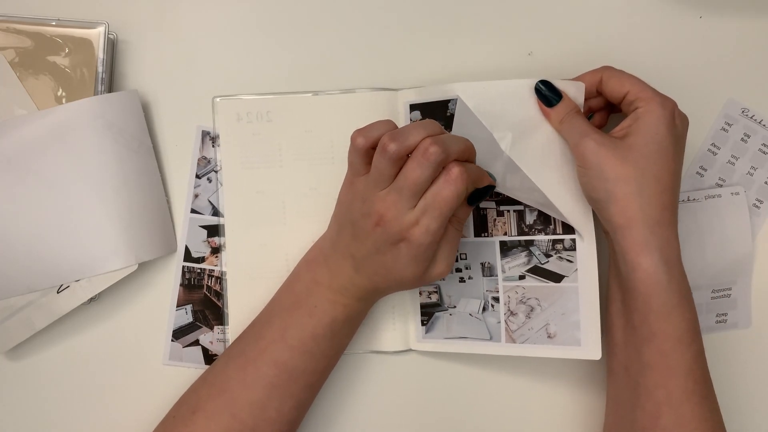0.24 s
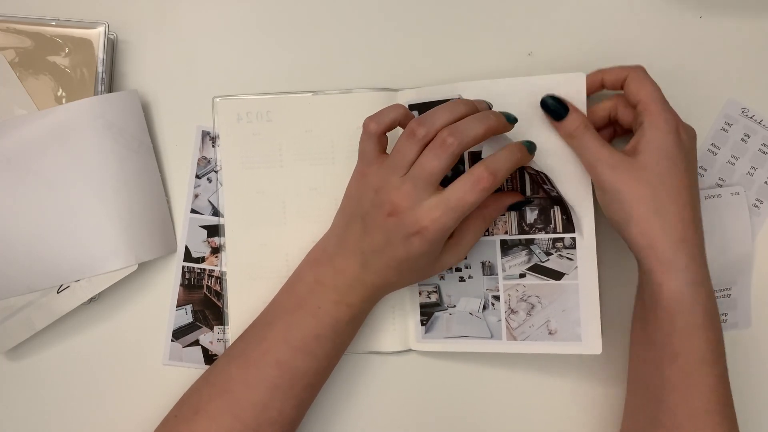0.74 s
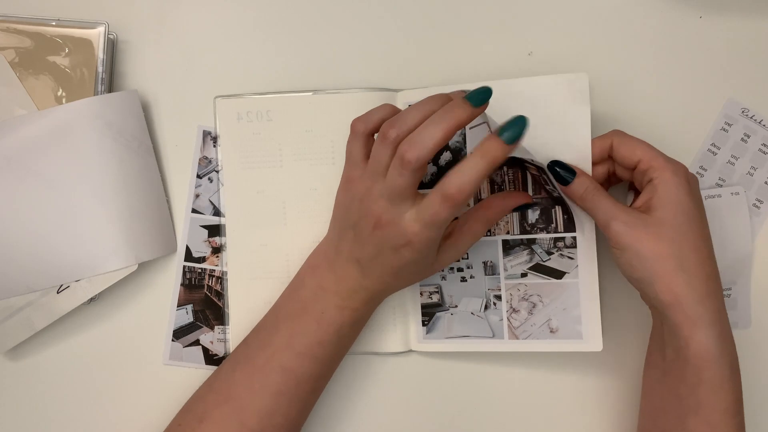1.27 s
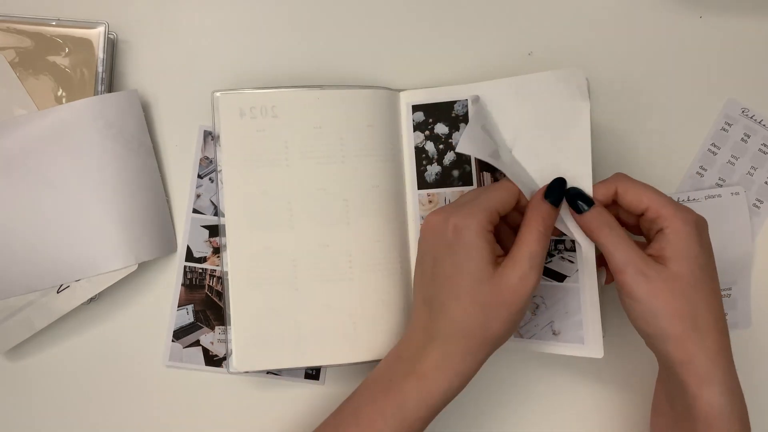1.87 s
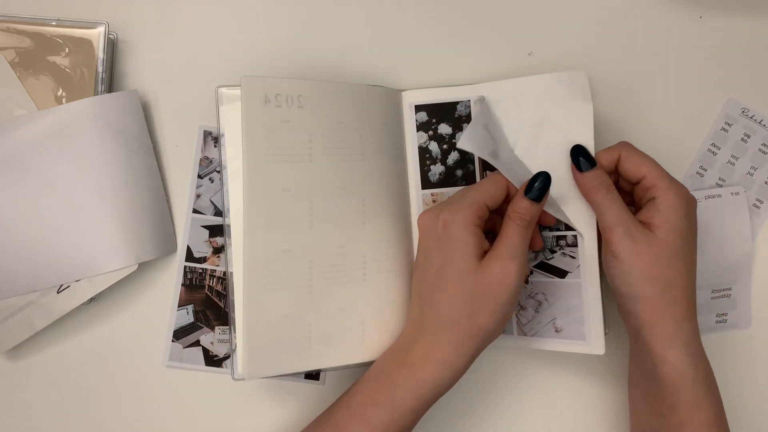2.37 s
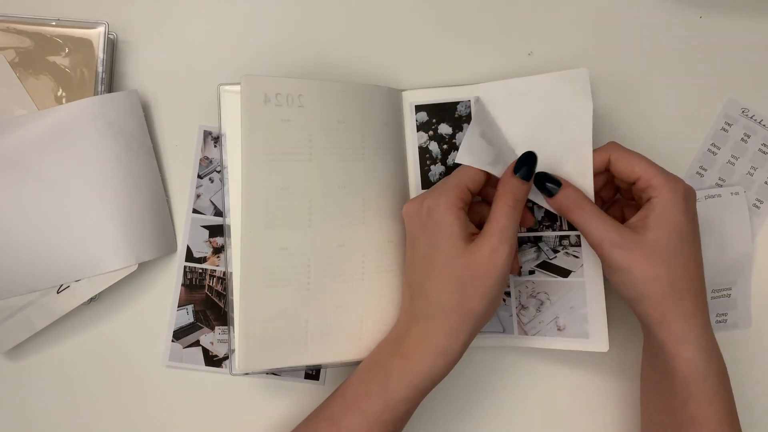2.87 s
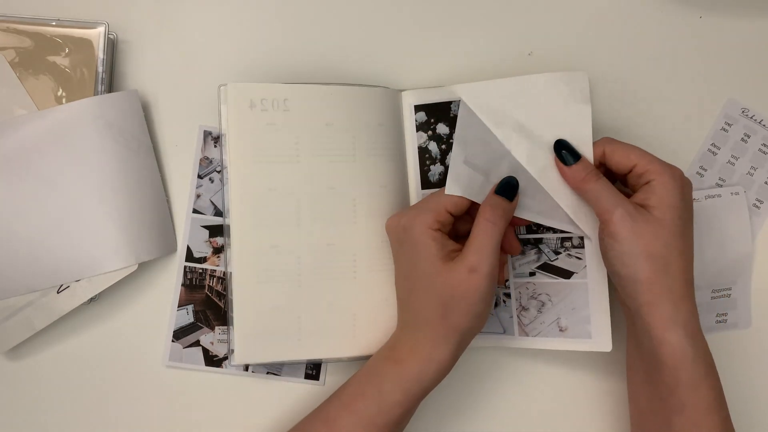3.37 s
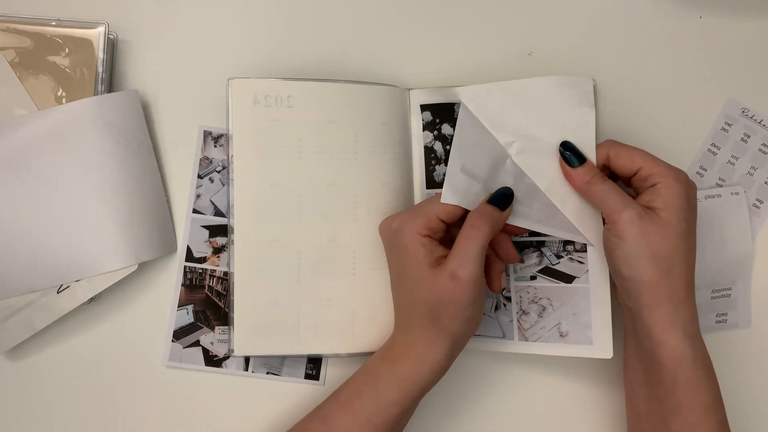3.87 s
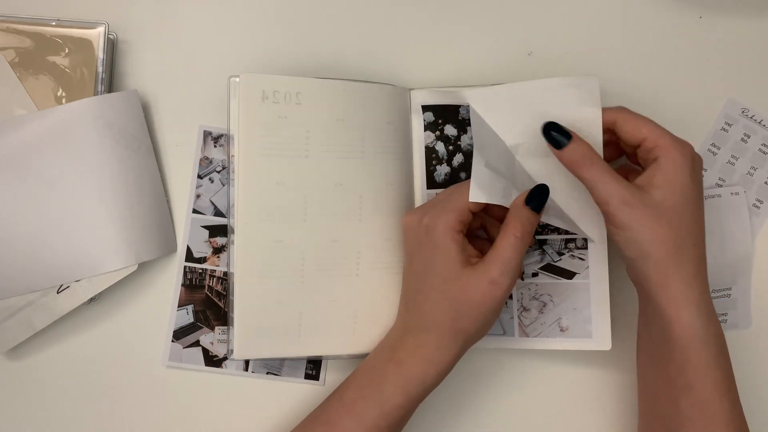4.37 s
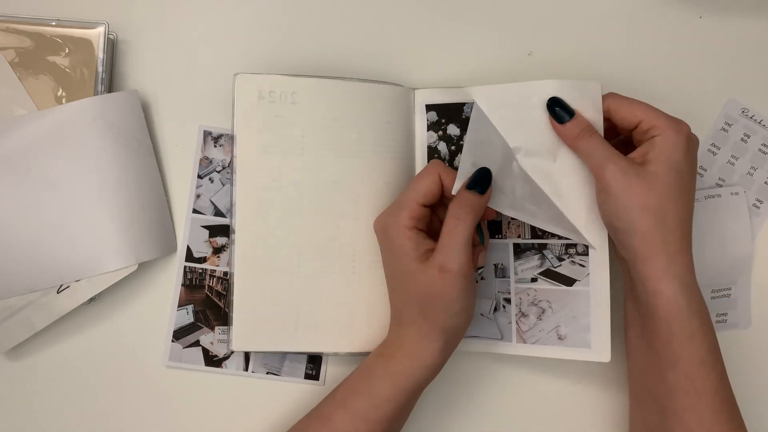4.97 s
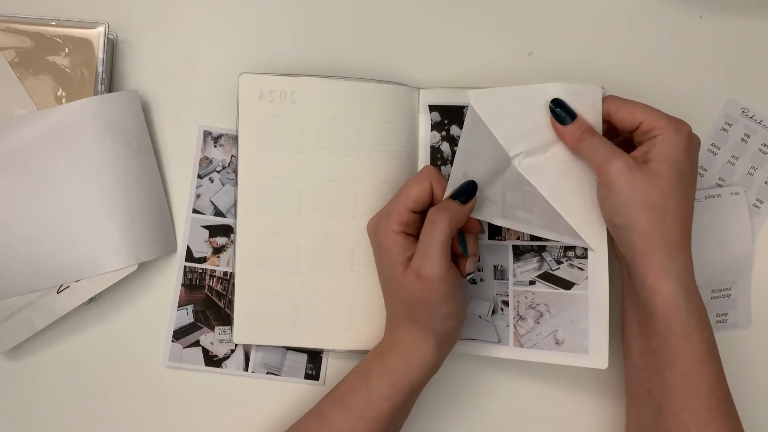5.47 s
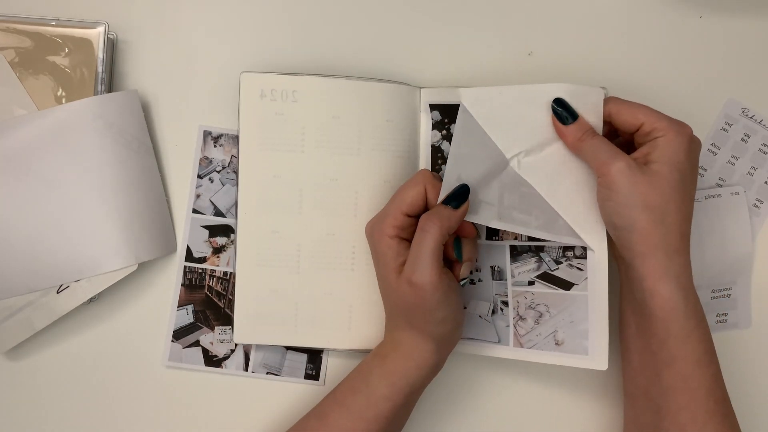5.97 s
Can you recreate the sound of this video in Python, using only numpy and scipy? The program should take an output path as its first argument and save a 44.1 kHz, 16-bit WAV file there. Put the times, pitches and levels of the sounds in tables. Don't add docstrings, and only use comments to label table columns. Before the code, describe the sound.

In a quiet small room, nails pick at the waxed backing of a large sticker in a notebook on a desk, giving crisp clicks and light thumps. A steady bright hiss of parting glue runs for over a second, flecked with snaps. Then the sheet is folded with sharp cracks, and settles in small irregular crinkles. Close stereo microphone above.

```python
import sys
import numpy as np
from scipy import signal
from scipy.fft import rfft, irfft
from scipy.io import wavfile
from scipy.ndimage import uniform_filter1d

SR = 44100
rng = np.random.default_rng(int(sys.argv[2]) if len(sys.argv) > 2 else 0)


def waveform_to_disk(signal):
    frames = np.transpose(np.atleast_2d(signal))
    scaled = np.clip(frames, -1, 1) * 32767
    samples = np.round(scaled).astype(np.int16)
    wavfile.write(sys.argv[1], SR, samples)


def voltage_ratio(level):
    return 10 ** (np.asarray(level, float) / 20)


N = 275184
HZ = np.arange(N // 2 + 1) * SR / N + 1e-3

# middle_s, half_length_s, deep_level_db, hum_over_deep_db
LEANS = [(0.76, 0.04, -85.5, 23), (1.237, 0.077, -66.5, 3.5), (1.42, 0.12, -60, -13),
         (1.752, 0.12, -57.5, -32), (1.984, 0.13, -56.5, -11), (2.28, 0.13, -60.5, -10),
         (2.9, 0.28, -69.5, -4.5), (3.34, 0.14, -87, 22), (4.385, 0.18, -76, 0), (4.556, 0.019, -66, 9),
         (4.608, 0.025, -57, -15), (5.874, 0.19, -75, 3), (6.184, 0.016, -64.5, 14.5)]
# pitch_hz, level_db
DEEP_COLOUR = [(26, -18), (31, -5), (38.5, -1), (46, -2), (60, -2.5), (75, -3.5), (90, -5.5)]
HUM_COLOUR = [(90, 1.5), (105, -7), (114, 9.5), (125, -5), (150, -5.5), (200, -2.5), (300, -17)]
DEEP_DB, HUM_DB, PATCHY_DB = -72, -76.5, 3.0
FAN_HZ, FAN_DB, FAN_OCTAVE_DB, FAN_NOISE_DB, FAN_IDLE_DB = 38, 1, -13, -6.5, -85

# middle_s, half_length_s, level_db, brightness_db
DRAGS = [(0.001, 0.029, -59.5, -15), (0.662, 0.012, -50, -4), (0.744, 0.01, -46, -8.5),
         (0.882, 0.075, -63.5, 1.5), (1.121, 0.016, -49.5, -16.5), (1.17, 0.021, -51.5, -14),
         (1.296, 0.025, -61.5, 0), (1.317, 0.087, -56, -13.5), (1.398, 0.022, -62, 0.5),
         (1.58, 0.027, -61, -4), (1.846, 0.057, -57, -9), (2.312, 0.0061, -51, 6.5),
         (2.474, 0.097, -44, -13), (2.637, 0.06, -48, -17), (2.974, 0.05, -56, -15),
         (3.404, 0.037, -61.5, 2.5), (3.95, 0.055, -92.5, 29), (4.006, 0.023, -54, -2),
         (4.016, 0.0047, -71, 22.5), (4.269, 0.016, -51.5, -15.5), (4.59, 0.016, -44.5, -23),
         (4.935, 0.025, -51, -40), (5.22, 0.077, -80, 12.5), (5.688, 0.22, -73, 6), (5.888, 0.073, -84, 10),
         (6.176, 0.018, -53.5, -11.5)]
# time_s, level_db
GRIP = [(0.0, -79.5), (0.54, -75), (0.69, -113), (0.9, -66.5), (1.27, -62.5), (1.45, -63.5), (2.47, -55.5),
        (3.0, -63.5), (3.45, -69), (3.77, -60.5), (4.05, -77), (4.26, -63.5), (4.45, -63), (4.78, -63),
        (5.51, -73), (5.79, -71), (6.1, -73.5), (6.24, -50)]
# time_s, level_db
PEEL = [
    (1.42, -84),
    (1.61, -54),
    (1.77, -44),
    (2.15, -43.5),
    (2.28, -46.5),
    (2.8, -46.5),
    (2.95, -48),
    (2.99, -63),
    (3.06, -106),
]
PEEL_MIDDLE_DB, PEEL_BODY_DB, RASP_RISE_DB_PER_S = -6.5, -13, 3
RASP_FOLLOWS = 0.59
GRIP_TREBLE_DB, GRIP_MIDDLE_DB = -13, -13
DRAG_MIDDLE_DB, DRAG_MIDDLE_SHARE = -0.5, 0.74
# pitch_hz, level_db
TREBLE_COLOUR = [(8000, 3), (8600, -1), (9600, -1), (11500, -6.5), (13000, -7.5), (15000, -10.5),
                 (15700, -2)]
MIDDLE_COLOUR = [(2000, -57), (2700, -14), (3600, -13), (5200, -6), (6500, 2), (7300, 10), (7750, 2)]
BODY_COLOUR = [(170, 1), (300, -9.5), (500, 0), (750, -10), (1100, -4.5), (1950, -2.5), (2600, 0),
               (5000, -15)]

# start_s, thud_level_db, crack_level_db, panel_pitch_hz
PICKS = [(0.0014, -49.5, -57.5, 580), (0.353, -76, -53, 980), (0.4825, -55.5, -51.5, 1470),
         (0.5903, -62.5, -84.5, 430), (0.648, -44, -27, 1310), (0.6594, -38.5, -32.5, 1190),
         (0.7385, -44.5, -29.5, 1300), (0.8688, -53.5, -47, 1430), (0.9308, -43, -77, 2140),
         (1.0013, -54, -53, 1238), (1.0896, -50, -50, 1260), (1.1137, -43.5, -49, 1880),
         (1.125, -74, -53, 1800), (1.202, -33.5, -26.5, 1270), (1.258, -36, -23, 1880),
         (1.2688, -53, -38, 1950), (1.292, -55, -83, 2020)]
TICKS = [(0.905, -58, -60, 2080), (0.941, -57, -64, 2200), (1.065, -64, -73, 1140), (1.079, -51, -67, 960),
         (1.101, -55, -60, 1100), (1.108, -61, -60, 1000), (1.162, -48, -46, 1970), (1.195, -48, -57, 1200),
         (1.217, -54, -60, 1100), (1.279, -48, -52, 1900), (2.259, -51.5, -50, 590), (2.3, -61, -46, 900),
         (2.439, -46.5, -50, 1630), (2.465, -62, -60, 600), (2.559, -59, -51, 1000),
         (2.584, -54.5, -60, 900), (2.705, -64, -41, 700), (2.774, -66, -38, 1840), (2.901, -57, -45, 2900),
         (2.936, -52, -45, 2700), (3.22, -57, -58, 1800), (3.397, -58, -60, 650), (3.494, -41.5, -53, 920),
         (4.167, -61, -79, 827), (4.231, -58, -68, 1160), (4.285, -44.5, -66, 900), (4.482, -72, -69, 2450),
         (0.638, -66, -51, 1010), (3.725, -50.5, -50, 1100), (3.99, -48, -56, 1100),
         (4.558, -48.5, -59, 1200), (4.592, -40, -57, 1300), (4.749, -65, -47, 2000),
         (4.845, -61.5, -68, 1000), (4.893, -62, -70, 1120), (4.935, -50.5, -65, 686),
         (5.003, -54.5, -58, 1020), (5.121, -62.5, -70, 1880), (5.138, -65, -72, 1000),
         (5.203, -60, -53, 820), (5.231, -52.5, -70, 460), (5.262, -58.5, -70, 520),
         (5.307, -60.5, -70, 1100), (5.427, -68, -56, 940), (5.713, -69, -65, 1010), (5.78, -57, -70, 450),
         (5.875, -70, -51, 1800), (6.02, -59.5, -79, 536), (6.07, -68, -68, 1200)]
TUGS = [(1.578, -55.5, -70, 480), (1.782, -49.5, -49, 1550), (1.908, -53, -60, 560), (2.14, -51, -60, 1000),
        (2.235, -53, -58, 540), (1.8281, -46.5, -39, 1580), (2.006, -47, -59, 1030),
        (2.2754, -43.5, -32, 1320), (2.311, -37.5, -34, 990), (2.366, -55, -52, 1110),
        (2.388, -46.5, -56, 1090), (2.3988, -50.5, -42, 1150), (2.4085, -47.5, -35, 1200),
        (2.444, -48, -35, 583), (2.514, -45, -39, 1220), (2.6189, -48.5, -43, 633), (2.6317, -48, -56, 895),
        (2.6436, -47.5, -57, 1750), (2.9489, -50, -36, 765), (3.0452, -46, -94, 910),
        (3.1805, -51.5, -82, 930), (3.2045, -45, -81, 1600), (3.2414, -52.5, -57, 880)]
CREASES = [(3.343, -30.5, -14, 2340), (3.352, -53.5, -35, 1800), (3.3836, -48, -45, 826),
           (3.4895, -35, -35, 1970), (3.499, -39.5, -51, 1040), (3.516, -42.5, -23.5, 1880),
           (3.7112, -39.5, -32.5, 1220), (4.0031, -37.5, -33, 970), (4.186, -52.5, -93, 1620),
           (4.243, -46.5, -42, 950), (4.258, -43, -45.5, 1880), (4.274, -39.5, -76, 1800),
           (4.5038, -46, -55, 1020), (4.5406, -47, -40.5, 820), (4.5805, -40, -29, 1030),
           (4.6048, -34, -18.5, 1800), (4.6123, -41.5, -29, 1870)]
SETTLES = [(4.7375, -57, -36.5, 2020), (4.7648, -56, -58, 1010), (4.8323, -65, -47.5, 1040),
           (4.8592, -68, -39.5, 910), (4.8706, -57.5, -38, 1830), (4.9127, -41.5, -36, 875),
           (4.9254, -45, -65, 724), (4.9676, -41, -27.5, 1880), (4.9776, -49.5, -44, 1820),
           (5.0412, -58, -47.5, 2060), (5.2201, -47.5, -74, 507), (5.2492, -65, -60, 536),
           (5.294, -64, -46.5, 920), (5.464, -42, -48, 2260), (5.4726, -53, -62, 630),
           (5.563, -60.5, -52, 2020), (5.6368, -62, -68, 950), (5.766, -48.5, -77, 714),
           (5.8026, -63, -44, 1950), (5.853, -53, -39.5, 1900), (6.0076, -54, -89, 520),
           (6.088, -62, -61.5, 980), (6.103, -58, -62, 990), (6.1492, -38, -44.5, 1150),
           (6.1574, -39, -55, 1530), (6.1876, -44, -65, 854)]
# start_s, crack_level_db
THREADS = [(2.3494, -36), (2.3964, -36), (2.4034, -35), (2.588, -37), (2.6194, -30), (2.6384, -34),
           (2.6824, -29), (2.7994, -41), (2.8184, -42), (2.8764, -38)]
THREAD_DB = -3.5
# pitch_hz, level_db
CHEST_COLOUR = [(250, -8.5), (400, -2.5), (700, -8.5), (1100, 1.5), (1400, -0.5)]
EDGE_COLOUR = [(1200, 2.5), (1500, -9.5), (1950, 6), (2400, 5.5), (3200, -1), (4500, -19)]
CRACK_COLOUR = [(2300, -24), (3000, -6), (4200, 2.5), (5500, 1.5), (7700, 4.5)]
SPARK_COLOUR = [(8000, 0), (10000, 0), (12500, -4), (15700, -11)]
EVEN_HZ, CHEST_DB_PER_OCTAVE, EDGE_DB_PER_OCTAVE, MIDDLE_SHARE = 1150, 3, 11, 0.43
ROOM_T60_S, ROOM_DB, WALL_CUT_HZ = 0.21, -12, 4500

# start_s, peak_level_db, pitch_hz, t60_s
KNOCKS = [(0.497, -60.5, 116, 0.34), (0.698, -52, 117.8, 0.36), (1.201, -45.5, 111.7, 0.4),
          (1.258, -50, 115, 0.35), (2.909, -54.5, 112.6, 0.56), (3.501, -47.5, 112.5, 0.1),
          (3.7, -51, 112, 0.11), (3.949, -55.5, 114.5, 0.39), (4.554, -41, 112.5, 0.25),
          (5.655, -58.5, 114, 0.17), (5.863, -58, 113, 0.23)]
THUMPS = [(1.203, -37.5, 553, 0.032), (1.204, -38, 310, 0.037), (0.66, -38, 734, 0.034),
          (5.222, -48, 473, 0.055), (6.009, -55.5, 545, 0.074), (0.649, -59, 431, 0.28),
          (0.664, -45, 226, 0.07), (0.743, -46, 245, 0.059), (1.201, -24.5, 401, 0.015),
          (2.42, -48.5, 394, 0.08), (2.625, -50, 220, 0.11), (4.179, -56.5, 382, 0.14),
          (4.559, -48.5, 262, 0.066), (4.598, -35.5, 193, 0.038), (5.766, -52, 433, 0.089)]
RINGS = [(3.344, -28.5, 4100, .012), (3.353, -30, 4100, .015), (3.343, -34, 4400, .008),
         (1.203, -32, 1880, .02), (4.967, -35.5, 1856, .015), (4.604, -33, 1960, .015),
         (3.49, -32.5, 2800, .01), (3.347, -38, 950, .03), (3.494, -40, 1000, .03),
         (2.312, -40, 1100, .015), (1.259, -26.5, 1942, 0.023), (1.279, -37, 1600, .015),
         (1.292, -42, 2030, .02), (1.313, -47, 1600, .03), (1.329, -44, 1700, .02),
         (1.114, -37, 1906, .015), (0.932, -41, 2300, .012), (6.1495, -36, 1200, .015),
         (4.5, -48, 980, .015), (3.047, -48, 910, 0.033), (5.472, -43.5, 3450, .015),
         (3.711, -24, 1116, 0.018), (4.273, -39, 1990, .012), (4.258, -38, 1670, .012),
         (1.2, -42, 1800, .01), (3.711, -28.5, 1940, 0.014), (5.465, -36.5, 665, 0.027),
         (5.465, -31.5, 2250, 0.013)]
SIDE_KNOCK = [
    (6.165, -34, 211, 0.23),
]

# middle_s, half_length_s, upper_level_db, lower_level_db
SCRAPES = [(1.3, 0.022, -54.5, -78), (3.1, 0.34, -69.5, -77), (3.75, 0.038, -58, -58),
           (3.66, 0.03, -70, -71), (3.87, 0.085, -75, -73), (4.4, 0.054, -70, -76), (4.65, 0.028, -61, -70),
           (5.0, 0.036, -63, -69), (5.5, 0.032, -63, -82), (5.3, 0.16, -77, -84), (5.7, 0.1, -75, -73.5),
           (5.88, .03, -73, -72)]
# pitch_hz, level_db
HIGH_SCRAPE_COLOUR = [(1500, -12), (1900, 0), (2500, -9)]
LOW_SCRAPE_COLOUR = [(800, -10), (1080, 0), (1450, -8)]
# pitch_hz, level_db
FLAP_COLOUR = [(2350, -12), (2660, -1.5), (3000, -7.5)]
FLAP_DB, FLAP_FADE_DB_PER_S = -56.5, 4

# pitch_hz, width_hz, level_db
PAPER_MODES = [(460, 20, 2.5), (895, 67, 4.5), (1040, 73, 1), (1220, 83, -1.5), (1550, 180, 2),
               (1880, 66, 5.5), (2020, 64, 2.5), (2260, 9.8, 6.5), (2700, 120, 1.5), (4070, 48, 3.5),
               (6950, 68, -8.5), (8370, 52, 5.5), (7800, 54, -1), (9470, 67, 0), (10200, 170, 1.5),
         (10900, 210, -3), (11350, 530, 5.5), (13600, 210, 0)]
DESK_ECHO_S, DESK_ECHO = 0.00092, 0.025
# pitch_hz, likeness_0_to_1
LIKENESS = [(30, .95), (250, .8), (1000, .8), (4000, .5), (5500, .6), (7000, .82), (9300, .98),
            (11700, .998), (16000, .8)]
# pitch_hz, left_over_right_db
PORT_BALANCE = [(200, -.2), (500, -1.5), (900, 1), (4000, 1), (8000, .5), (12000, -.5)]
PORT_LAG_S, TURN_WIDTH_HZ = 215e-6, 400

# start_s, end_s, level_db The noise filter closes on the
DIMMED = [(1.186, 1.28, -2), (2.315, 2.9, -12.5), (3.514, 3.938, -8.5), (4.008, 4.205, -8.5),
          (4.681, 5.165, -3), (4.822, 4.908, -12), (4.92, 4.985, -6.5), (6, 6.054, -6)]
TOP_RIDES = [(0, .45, 7.5), (.95, 1.19, 4.5), (1.19, 1.28, 11), (1.34, 1.45, 8), (1.5, 1.72, -7.5),
             (3.45, 3.62, -8), (3.78, 4.12, 6.5), (4.33, 4.5, 6), (4.68, 4.8, -11), (5.05, 5.2, 8),
             (5.33, 5.45, 3)]
LOW_RIDES = [(0, .3, 3.5), (.6, .7, 1), (1.3, 1.65, -3), (3.1, 3.2, -2), (3.7, 4.0, -6.5), (4.33, 4.47, -7),
             (4.6, 5.15, -6), (5.7, 5.8, -1.5)]
SPLIT_HZ, TOP_BAND_HZ, LOW_BAND_HZ = 7800, (11800, 16400), (300, 780)
NOTCH_HZ, NOTCH_POWER = (6800, 7750), 1.7
TOP_HZ, CEILING = 15900, .42


def in_time(rows):
    s, *columns = np.transpose(rows)
    return [np.interp(np.arange(N) / SR, s, c) for c in columns]


def at_hz(points):
    hz, value = np.transpose(points)
    return np.interp(np.log(HZ), np.log(hz), value)


def rms_one(x):
    return x / np.sqrt(np.mean(x ** 2) + 1e-20)


def colour(x, points):
    below = (points[0][0] * .94, points[0][1] - 25)
    above = (points[-1][0] * 1.06, points[-1][1] - 25)
    curve = [(1, -120), below] + list(points) + [above, (SR, -120)]
    return irfft(rfft(x) * voltage_ratio(at_hz(curve)), N)


def drift(rate_hz):
    r = np.exp(-2 * np.pi * rate_hz / SR)
    wander = signal.lfilter([1], [1, -2 * r, r * r], rng.standard_normal(N + SR))
    return rms_one(wander[SR:])


def ringing(hz, r):
    return [1, -2 * r * np.cos(2 * np.pi * hz / SR), r * r]


def bells(rows):
    t, power = np.arange(N) / SR, np.zeros((len(rows[0]) - 2, N))
    for s, half, *level_db in rows:
        near = slice(max(round((s - 4 * half) * SR), 0), round((s + 4 * half) * SR))
        swell = np.exp(-((t[near] - s) / half) ** 2)
        power[:, near] += voltage_ratio(np.array(level_db))[:, None] ** 2 * swell
    return power


def rumble():
    leaning = bells([(s, half, db, db + hum) for s, half, db, hum in LEANS])
    deep, hum = np.sqrt(voltage_ratio([[DEEP_DB], [HUM_DB]]) ** 2 + leaning)
    noise = rng.standard_normal((3, N))
    phase = 2 * np.pi * FAN_HZ * np.arange(N) / SR
    tone = voltage_ratio(FAN_DB) * np.sin(phase) + voltage_ratio(FAN_OCTAVE_DB) * np.sin(2 * phase)
    tone = tone * [[1], [0], [0]]
    pressed = np.sqrt(voltage_ratio(FAN_IDLE_DB) ** 2 + leaning[0])
    deep_noise = deep * voltage_ratio(FAN_NOISE_DB) * rms_one(colour(noise, DEEP_COLOUR))
    return deep_noise + pressed * tone + hum * rms_one(colour(noise, HUM_COLOUR))


def friction():
    (peel_db,), (grip_db,) = in_time(PEEL), in_time(GRIP)
    rasp_db = PEEL_MIDDLE_DB + RASP_RISE_DB_PER_S * (np.arange(N) / SR - 2)
    rasp_db = rasp_db + (RASP_FOLLOWS - 1) * np.maximum(peel_db + 38.5, -25)
    level = np.zeros(N)
    peel = voltage_ratio(peel_db + np.array([level, rasp_db, level + PEEL_BODY_DB]))
    grip = voltage_ratio(grip_db + np.array([[GRIP_TREBLE_DB], [GRIP_MIDDLE_DB], [0]]))
    drags = bells([(s, half, db + bright, db + DRAG_MIDDLE_DB + DRAG_MIDDLE_SHARE * bright, db)
                   for s, half, db, bright in DRAGS])
    return np.sqrt(peel ** 2 + grip ** 2 + drags)


def grains(per_s, spread_db, smooth):
    sizes = voltage_ratio(spread_db * np.minimum(rng.exponential(1, N), 5)) * (rng.random(N) < per_s / SR)
    return rng.standard_normal((3, N)) * (rms_one(sizes) + smooth)


def flecks(per_s, spread_db, count=14):
    sizes = voltage_ratio(spread_db * np.minimum(rng.exponential(1, N), 4)) * (rng.random(N) < per_s / SR)
    blows = sizes * rng.choice([-1, 1], (3, N))
    dealt, out = rng.integers(0, count, N), 0
    for k, hz in enumerate(np.geomspace(450, 4200, count)):
        r = voltage_ratio(-60 * hz / (9.0 * SR))
        out = out + signal.lfilter([1, -1], ringing(hz, r), blows * (dealt == k) + 1e-18)
    return rms_one(out)


def rustle():
    flutter = drift(21.0)
    slips = grains(per_s=5000, spread_db=-2.5, smooth=2.15)
    treble, middle, body = friction()
    crinkle = body * voltage_ratio(-13.0 + 2.9 * drift(15)) * flecks(per_s=300, spread_db=-1.0)
    treble = treble * voltage_ratio(0.21 * flutter + 0.86 * drift(60)) * rms_one(colour(slips, TREBLE_COLOUR))
    middle = middle * voltage_ratio(2.5 + 1.6 * flutter + 0.31 * drift(60)) * rms_one(colour(slips, MIDDLE_COLOUR))
    body = body * voltage_ratio(-2.0 + 1.9 * flutter + 0.76 * drift(40)) * rms_one(colour(slips, BODY_COLOUR))
    return treble + dimming(DIMMED) * (middle + body + crinkle + flap() + scrape())


def snaps(events, crack_s=0.0027, body_s=0.0046, build_s=0.00092, width=0.46):
    size = SR // 20
    t = np.arange(size) / SR - .002
    rising = np.exp(np.minimum(t, 0) / build_s)
    crack_shape = rising * np.exp(-np.maximum(t, 0) / crack_s)
    thud_shape = rising * np.exp(-np.maximum(t, 0) / body_s)
    trains = np.zeros((5, 3, N + size))
    for s, thud_db, treble_db, hz in events:
        octaves = np.log2(hz / EVEN_HZ)
        chest_db = thud_db - CHEST_DB_PER_OCTAVE * max(octaves, 0)
        edge_db = thud_db + EDGE_DB_PER_OCTAVE * min(octaves, 0)
        middle_db = min(edge_db + MIDDLE_SHARE * (treble_db - edge_db), treble_db + 1)
        noise = rng.standard_normal((3, size))
        ragged = voltage_ratio(4.4 * rng.standard_normal(size // 40 + 1)).repeat(40)[:size]
        crack = rms_one(noise * ragged * crack_shape)
        thud = rms_one(noise * np.sqrt(ragged) * thud_shape)
        r = np.exp(-np.pi * width * hz / SR)
        panel = rms_one(signal.lfilter([1, -1], ringing(hz, r), thud))
        at = max(round((s - .001) * SR), 0)
        levels_db = thud_db - 15.5, chest_db - 4.5, edge_db - 8.0, middle_db - 20.0, treble_db - 13.0
        for train, burst, level_db in zip(trains, (panel, thud, thud, crack, crack), levels_db):
            train[:, at:at + size] += voltage_ratio(level_db) * burst
    panel, chest, edge, middle, treble = trains[..., :N]
    low = panel + colour(chest, CHEST_COLOUR) + colour(edge, EDGE_COLOUR)
    return low + colour(middle, CRACK_COLOUR) + colour(treble, SPARK_COLOUR)


def room(x):
    t = np.arange(SR // 2) / SR
    tail = rng.standard_normal((3, len(t))) * voltage_ratio(-60 * t / ROOM_T60_S) * (t > .006)
    tail = signal.lfilter([1], [1, -np.exp(-2 * np.pi * WALL_CUT_HZ / SR)], tail)
    tail = voltage_ratio(ROOM_DB) * tail / np.sqrt(np.sum(tail ** 2, axis=1, keepdims=True))
    return signal.fftconvolve(x[:1], tail, axes=1)[:, :N]


def knocks(table, swell_s, left_leads):
    out, t = np.zeros((2, N + SR)), np.arange(SR) / SR
    lead = np.array([[left_leads], [0]])
    for s, peak_db, hz, t60 in table:
        ring = np.sin(2 * np.pi * hz * t + lead) * voltage_ratio(peak_db - 60 * t / max(t60, .02))
        at = round(s * SR)
        out[:, at:at + SR] += ring * (1 - np.exp(-t / swell_s))
    return out[:, :N]


def scrape():
    high, low = np.sqrt(bells(SCRAPES))
    high_noise = rms_one(colour(rng.standard_normal((3, N)), HIGH_SCRAPE_COLOUR))
    low_noise = rms_one(colour(rng.standard_normal((3, N)), LOW_SCRAPE_COLOUR))
    return high * voltage_ratio(3.1 * drift(28)) * high_noise + low * voltage_ratio(3.2 * drift(30)) * low_noise


def flap():
    peel_db, = in_time(PEEL)
    started_db = np.clip((peel_db + 63.0) / 5.3, -4, 0) * 10
    fade_db = FLAP_FADE_DB_PER_S * (np.arange(N) / SR - 1.6)
    level_db = FLAP_DB + started_db - fade_db + 2.0 * drift(5)
    return voltage_ratio(level_db) * rms_one(colour(rng.standard_normal((3, N)), FLAP_COLOUR))


def surroundings(x):
    lift = np.prod([1 + (voltage_ratio(db) - 1) / (1 + 2j * (HZ - hz) / width_hz)
                    for hz, width_hz, db in PAPER_MODES], axis=0)
    echo = 1 + DESK_ECHO * np.exp(-2j * np.pi * HZ * DESK_ECHO_S)
    return irfft(rfft(x) * lift * echo, N)


def ports(strands):
    common, left, right = rfft(strands)
    alike = np.clip(at_hz(LIKENESS), 0, 1)
    cycles = HZ * PORT_LAG_S
    cycles = np.where(cycles < 1, cycles ** 1.17, cycles)
    turn = np.exp(-1j * np.pi * np.hypot(cycles - 1, TURN_WIDTH_HZ * PORT_LAG_S))
    shared = np.sqrt(alike) * common * np.array([turn, turn.conj()])
    pair = shared + np.sqrt(1 - alike) * np.array([left, right])
    return irfft(pair * voltage_ratio(at_hz(PORT_BALANCE) * [[.5], [-.5]]), N)


def dimming(table):
    db = np.zeros(N)
    for start, end, level_db in table:
        db[round(start * SR):round(end * SR)] = level_db
    return voltage_ratio(uniform_filter1d(db, size=500))


def ride(x, band_hz, gain):
    band = signal.butter(3, band_hz, "band", fs=SR, output="sos")
    return x + (gain - 1) * signal.sosfiltfilt(band, x)


def scene():
    building = rumble() * voltage_ratio(PATCHY_DB * drift(4.0))
    clicks, dim = snaps(PICKS + TUGS + CREASES + SETTLES), dimming(DIMMED)
    echoes = room(clicks)
    under_split = signal.sosfiltfilt(signal.butter(6, SPLIT_HZ, fs=SR, output="sos"), echoes)
    paper = rustle() + clicks + echoes + (dim - 1) * under_split
    threads = [(s, -80, db + THREAD_DB, 1000) for s, db in THREADS]
    ticks = snaps(TICKS + threads, crack_s=0.0021, body_s=0.0035)
    desk = knocks(KNOCKS, swell_s=.003, left_leads=-.1) + knocks(THUMPS, swell_s=.0015, left_leads=-.9)
    desk = desk + knocks(SIDE_KNOCK, swell_s=.012, left_leads=1.8)
    rings = knocks(RINGS, swell_s=0.00056, left_leads=0.99)
    heard = ports(surroundings(paper + ticks) + building) + desk + rings
    heard = ride(heard, TOP_BAND_HZ, dimming(TOP_RIDES))
    heard = ride(heard, LOW_BAND_HZ, dimming(LOW_RIDES))
    return ride(heard, NOTCH_HZ, dim ** NOTCH_POWER)


def roll_off(x):
    return signal.sosfilt(signal.butter(12, 16840, fs=SR, output="sos"), x)


def record(dry):
    rounded = CEILING * np.tanh(dry / CEILING)
    top_cut = signal.cheby2(10, 30, TOP_HZ + 500, fs=SR, output="sos")
    mix = signal.sosfilt(top_cut, rounded)
    return roll_off(mix)


dry = scene()
out = record(dry)
waveform_to_disk(out)
```